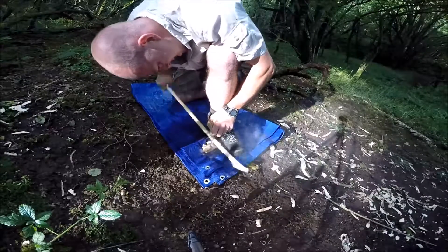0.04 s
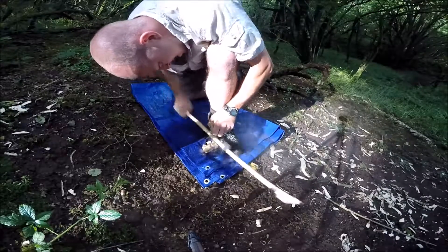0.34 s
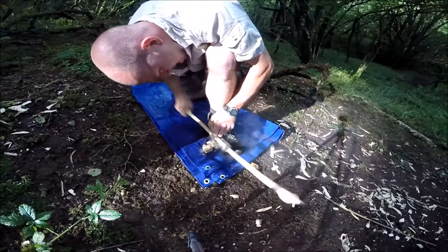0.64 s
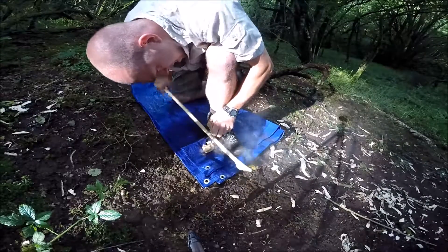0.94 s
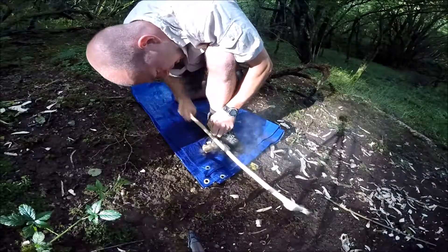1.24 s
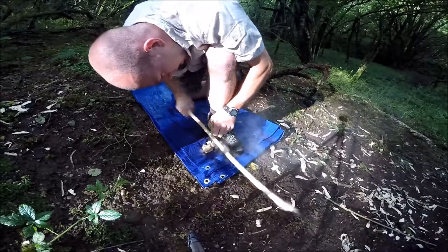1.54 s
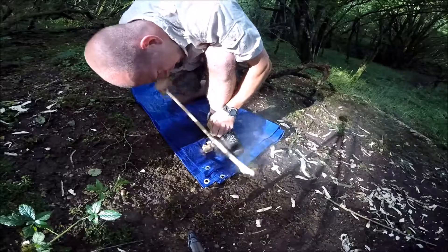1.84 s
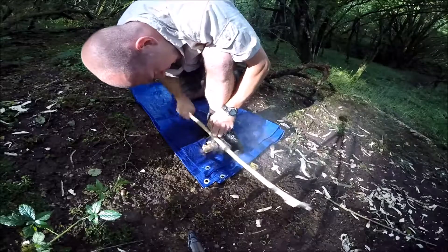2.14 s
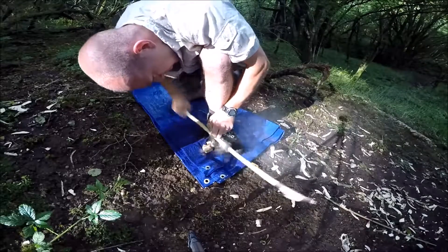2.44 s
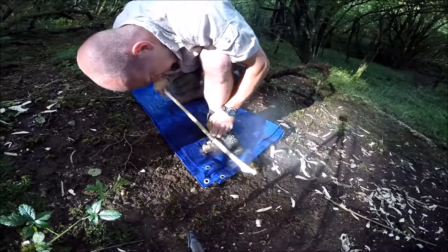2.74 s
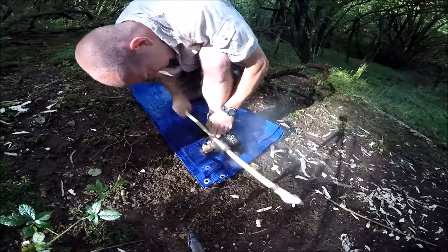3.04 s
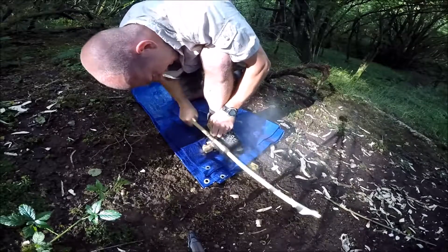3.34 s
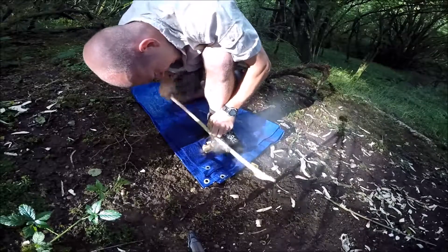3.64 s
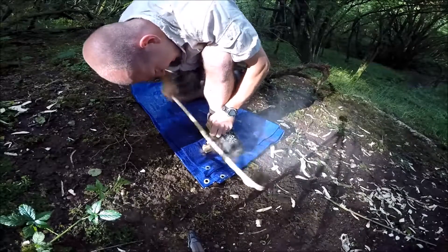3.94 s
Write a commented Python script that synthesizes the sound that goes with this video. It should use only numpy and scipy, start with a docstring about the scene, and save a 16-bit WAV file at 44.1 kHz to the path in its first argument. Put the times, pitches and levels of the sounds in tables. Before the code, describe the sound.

A bow drill's wooden spindle grinds against a board in quick, even back-and-forth strokes, each swelling and fading. The board judders on the ground with soft thumps and occasional ticks, close by, over a low outdoor rumble.

```python
"""Outdoors, on a wooden board lying on a tarp, a bow drill runs at about two strokes each way a second.
The spindle grinds in its socket as charred fibres slip and snap, speeding up and stopping with every
stroke, and knocks now and then. The board judders against the ground and body weight thuds into the soil.
Under it lie a low rumble, soft air and a faint pulsing electrical whine."""
import sys
import numpy as np
from scipy import signal
from scipy.fft import rfft, irfft
from scipy.io import wavfile
from scipy.ndimage import uniform_filter1d

SR = 44100
rng = np.random.default_rng(int(sys.argv[2]) if len(sys.argv) > 2 else 0)


def inscribe(sig):
    """Save sig as 16-bit PCM at rate SR to the path in sys.argv[1].

    A 1-D sig is mono; a 2-D sig holds one channel per row.
    Samples are clipped to [-1, 1] before scaling.
    """
    pcm = np.round(np.clip(np.atleast_2d(sig).T, -1, 1) * 32767)
    wavfile.write(sys.argv[1], SR, pcm.astype(np.int16))


N = 176400
T = np.arange(N) / SR
HZ = np.fft.rfftfreq(N, 1 / SR)

# Strokes of the bow. Each row: moment of full speed in seconds, run-up in seconds, level in dB,
# the socket's rasp in dB against the stroke.
PUSHES = [(0.217, 0.079, -47, -7), (0.695, 0.0766, -46.5, -18), (1.152, 0.0785, -46, -7),
          (1.587, 0.066, -46, -5), (2.039, 0.069, -46, -10), (2.482, 0.053, -44, -4.5),
          (2.915, 0.0597, -43, -4), (3.34, 0.0637, -46, -5), (3.752, 0.061, -46, -3.5)]
PULLS = [(-0.005, 0.065, -48, -13.5), (0.465, 0.0871, -47, -6), (0.921, 0.0878, -45.5, -10),
         (1.364, 0.0778, -47, -8), (1.836, 0.0879, -45.5, -4.5), (2.275, 0.0996, -48.5, -5),
         (2.717, 0.0838, -45, -4.5), (3.139, 0.0795, -44.5, -4.5), (3.555, 0.075, -46.5, -3.5),
         (3.966, 0.063, -44, -3)]
# Resonances of spindle and board. Each row: pitch in Hz, width in Hz, relative dB on a push and on a pull.
WOOD = [(786, 540, -20, -16.5), (1016, 35, -11.5, -16.5), (1498, 200, -5, -3), (1694, 165, -1, 1.5),
        (1870, 124, -1, -4.5), (2603, 110, -5, -2), (2840, 223, -13.5, 1.5), (3392, 654, -2.5, -4),
        (4464, 170, -7, -3.5), (4848, 263, -6.5, -1.5), (5290, 450, -11.5, -8), (5850, 330, -16, -13),
        (6430, 240, -16, -19.5), (7770, 1200, -26, -26.5), (9860, 1160, -30, -27.5)]


def spindle():
    """Pushes are shorter, grittier and airier than pulls; both set a few narrow resonances singing."""
    # Singing resonances. Each row: pitch in Hz, width in Hz, level in dB against the stroke.
    modes = [(759, 36.1, -26), (1842, 54.7, -13.5), (2870, 44, -21.5)]
    # Fine wood dust hissing on the pushes. Each row: frequency in Hz, relative level in dB.
    dust_spectrum = [(3000, -37), (9000, -9), (12000, -3), (15000, 3)]
    _, _, push_db, pull_db = np.transpose(WOOD)
    push = grind(PUSHES, push_db, level_db=-2.0, turns_per_s=29, wobble_db=2.0, flutter_db=0.8,
                 grains_per_s=1100, grain_spread_db=3.5, grit=0.51)
    pull = grind(PULLS, pull_db, level_db=-1.4, turns_per_s=61, wobble_db=1.5, flutter_db=1.85,
                 grains_per_s=1500, grain_spread_db=5.5, grit=0.31)
    singing = sum(amp(db) * unit(drift(width) * tone(hz + width / 2 * drift(38.2)))
                  for hz, width, db in modes)
    dust = amp(-29) * effort(PUSHES) * noise(dust_spectrum)
    return shifting_contact(push + pull + dust + effort(PUSHES + PULLS) * singing)


def grind(strokes, wood_db, level_db, turns_per_s, wobble_db, flutter_db,
          grains_per_s, grain_spread_db, grit):
    """Charred fibres slip and snap under the spindle, which bites harder once in every turn."""
    force = effort(strokes)
    speed = np.sqrt(force / force.max())
    turns = np.cumsum(turns_per_s * speed * (1 + 0.15 * drift(22))) / SR + rng.random()
    bite = amp(wobble_db * np.cos(2 * np.pi * turns) + flutter_db * drift(140))
    snaps = (rng.random(N) < grains_per_s * speed / SR) * rng.choice([-1, 1], N)
    sizes = amp(grain_spread_db * np.minimum(rng.exponential(1, N), 3.5))
    friction = unit(bite * (rng.standard_normal(N) + grit * unit(snaps * sizes)))
    rasp_hz = 3255 * (1 + .03 * (speed - 1))  # the socket's rasp sinks as the spindle slows
    rasp = resonate(bite * rng.standard_normal(N), rasp_hz, width_hz=230)
    return amp(level_db) * (wood(force * friction, wood_db) + effort(strokes, rasp=True) * rasp)


def effort(strokes, rasp=False):
    """Strength of the rubbing, or of the rasp: it swells to full speed and dies as the bow turns."""
    slowing_s, fall_db, flatness = .057, 10, 2.653
    strength = np.zeros(N)
    for peak_s, run_up_s, db, rasp_db in strokes:
        from_peak = abs(T - peak_s) / np.where(T < peak_s, run_up_s, slowing_s)
        strength += amp(db + rasp * rasp_db - fall_db * from_peak ** flatness)
    return strength


def wood(x, levels_db):
    """Rings the resonances of spindle and board in the given balance."""
    power = sum(amp(db) ** 2 / (1 + ((HZ - hz) / width) ** 2) ** 3
                for (hz, width, _, _), db in zip(WOOD, levels_db))
    log_gain = np.log(power + 1e-9) / 2
    mirrored = np.r_[log_gain, log_gain[-2:0:-1]]
    response = np.exp(np.conj(signal.hilbert(mirrored)))  # minimum phase: the ring follows the hit
    ring = np.fft.ifft(response).real[:2048]
    return signal.oaconvolve(x, ring / np.linalg.norm(ring))[:N]


def shifting_contact(x, patch_db=1.9, dulling_db_per_s=1, treble_hz=3750):
    """Resonances come and go as the spindle leans; the treble dulls as the socket chars."""
    hz, t, spectrum = signal.stft(x, SR, nperseg=512, noverlap=384)
    swells = uniform_filter1d(rng.standard_normal((len(t), len(hz))), size=7, axis=0)
    patches = unit(uniform_filter1d(swells, size=3, axis=1))
    treble = hz ** 8 / (hz ** 8 + treble_hz ** 8)
    wear_db = (t - t.mean())[:, None] * -dulling_db_per_s * treble
    gain = amp(patch_db * patches + wear_db).T
    return signal.istft(spectrum * gain, SR, nperseg=512, noverlap=384)[1][:N]


def knocks():
    """The spindle ticks in its socket; the board rocks with a hollow clunk."""
    # Ticks and clunks. Each row: start in seconds, level in dB.
    tick_hits = [(0.566, -49), (1.014, -56), (1.080, -43), (2.815, -51), (2.891, -37.5)]
    clunk_hits = [(0.566, -53), (1.171, -55.5), (2.07, -57), (2.946, -51.5)]
    # The clunk's hollow colour. Each row: frequency in Hz, relative level in dB.
    hollow = [(330, -18), (530, 0), (850, -4), (2500, -31)]
    dull_db = [push_db - .0015 * hz for hz, _, push_db, _ in WOOD]
    ticks = wood(decays(tick_hits, fade_s=0.0039) * rng.standard_normal(N), dull_db)
    return ticks + decays(clunk_hits, fade_s=0.0063) * noise(hollow)


def board():
    """The board judders on the ground with a higher ring, and murmurs just behind each stroke."""
    # Judders. Each row: centre in seconds, half length in seconds, pitch in Hz, level in dB, ring in dB.
    judders = [(0.026, 0.011, 104, -25, -35.5), (0.075, 0.02, 106.7, -33.5, -59),
               (0.242, 0.035, 96.3, -34, -46), (0.309, 0.017, 124.6, -36, -63),
               (0.557, 0.015, 102, -32, -53), (0.735, 0.031, 95, -29.5, -51),
               (0.977, 0.0089, 97.95, -31, -42.5), (1.01, 0.014, 109.3, -34.5, -55),
               (1.173, 0.04, 94, -33, -51.5), (1.47, 0.04, 105.7, -42.5, -73),
               (1.628, 0.036, 92.8, -32, -52.5), (1.688, 0.026, 118.5, -34.5, -62),
               (1.895, 0.018, 99, -32, -51.5), (2.093, 0.016, 96, -29.5, -52),
               (2.296, 0.015, 119.2, -35.5, -57), (2.526, 0.037, 89.9, -34.5, -57.5),
               (2.592, 0.017, 117, -30.5, -64), (2.737, 0.0083, 106.5, -31, -50),
               (2.795, 0.03, 125.1, -35, -56.5), (2.967, 0.028, 101, -32.5, -58),
               (3.118, 0.013, 110.7, -40.5, -51), (3.368, 0.037, 97, -33, -54),
               (3.44, 0.013, 128, -33.5, -81), (3.597, 0.015, 112.8, -38, -61),
               (3.782, 0.039, 96.6, -35.5, -54.5), (3.847, 0.013, 111, -31.5, -71)]
    # The wood's low murmur. Each row: frequency in Hz, relative level in dB.
    murmur = [(60, -9), (135, 7.5), (160, 6.5), (178, -8), (210, 3), (240, -10.5), (285, 3), (335, -13.5),
              (375, -17), (430, -21.5), (800, -46.5)]
    out, wander, rough = np.zeros(N), drift(40.2), drift(75)
    ring = tone(275 + 20 * drift(52.24)) * unit(1 + 0.44 * drift(30))
    for centre_s, half_s, hz, db, ring_db in judders:
        swell = np.exp(-((T - centre_s) / half_s) ** 2 / 2)
        shudder = amp(db) * tone(hz * (1 + .075 * wander)) * (1 + .27 * rough)
        out += swell * (shudder + amp(ring_db) * ring)
    lag_s, pull_db = 0.037, -2.5
    load = np.interp(T - lag_s, T, effort(PUSHES) + amp(pull_db) * effort(PULLS))
    return out + amp(-3) * load * noise(murmur)


def thuds(hz=35.07, rise_s=0.05, fade_s=0.095):
    """Body weight thuds into the soil, mostly at the end of a push."""
    # Each row: peak in seconds, level in dB.
    peaks = [(.31, -36.5), (.765, -32), (1.22, -37.5), (1.66, -39.5), (2.12, -36), (2.554, -32),
             (3.01, -36.5), (3.43, -40), (3.62, -42.5)]
    weight = sum(amp(db) * np.exp(-abs(T - s) / np.where(T < s, rise_s, fade_s)) for s, db in peaks)
    return weight * tone(hz + 2 * drift(15.2))


def outdoors():
    """A steady bed of ground rumble and soft air."""
    # Their colours. Each row: frequency in Hz, relative level in dB.
    rumble = [(15, -24), (35, -1), (55, -4), (95, -1), (135, -4.5), (160, -12), (180, -28.5), (230, -34.5),
              (280, -17.5), (335, -42.5), (375, -29), (450, -67), (900, -72)]
    air = [(100, -22), (400, 3), (800, 1.5), (1500, -5), (3200, -0.5), (6000, -7), (10000, -12),
           (15000, -15.5)]
    return amp(-41) * noise(rumble) + amp(-65) * noise(air)


def whine(pips_per_s=40, buzz_db=-73.5):
    """A faint electrical whine in quick pips, with a thinner whistle above and an occasional buzz."""
    # Short thin buzzes. Each row: start in seconds, end in seconds.
    buzzes = [(1.915, 2.0), (3.82, 3.9)]
    pulse = (1 + np.cos(2 * np.pi * pips_per_s * (T - .002))) / 2
    pips = amp(-72) * pulse ** 3.6 * tone(8450 + 45 * drift(166))
    whistle = amp(-83) * pulse * tone(13480 + 20 * drift(200))
    gate = uniform_filter1d(sum(1. * (T > start) * (T < end) for start, end in buzzes), size=300)
    root_hz = 3240 + 22 * drift(320)
    buzz = amp(buzz_db) * tone(2 * root_hz) + amp(buzz_db - 7) * tone(3 * root_hz)
    return pips + whistle + gate * buzz


def amp(db):
    """Decibels to gain."""
    return 10 ** (np.asarray(db) / 20)


def unit(x):
    """Scales to rms 1."""
    return x / np.sqrt(np.mean(x ** 2) + 1e-20)


def noise(points):
    """Noise of rms 1, coloured by (Hz, dB) points."""
    hz, db = np.transpose(points)
    colour = amp(np.interp(np.log(HZ + 1), np.log(hz), db))
    return unit(irfft(rfft(rng.standard_normal(N)) * colour, N))


def drift(rate_hz):
    """A smooth random wander of rms 1, up to about the given rate."""
    return unit(irfft(rfft(rng.standard_normal(N)) * np.exp(-(HZ / rate_hz) ** 2), N))


def tone(hz):
    """A sine of rms 1 that follows a pitch curve."""
    return np.sqrt(2) * np.sin(2 * np.pi * (np.cumsum(hz) / SR + rng.random()))


def decays(hits, fade_s):
    """An envelope that jumps at each hit and dies away."""
    return sum(amp(db) * (T >= s) * np.exp(-abs(T - s) / fade_s) for s, db in hits)


def resonate(x, hz, width_hz):
    """A steep resonance that follows a pitch curve."""
    carrier = np.exp(2j * np.pi * np.cumsum(hz) / SR)
    pole = np.exp(-np.pi * width_hz / SR)
    return unit((carrier * signal.lfilter([1], [1, -2 * pole, pole * pole], x / carrier)).real)


def scene():
    """Everything at one nearby microphone."""
    return (spindle() + knocks() + board() + thuds() + outdoors() + whine())[None]


def record(dry, low_cut_hz=21.3, high_cut_hz=15350):
    """A low cut and a steep high cut trim the extremes."""
    low_cut = signal.butter(3, low_cut_hz, "highpass", fs=SR, output="sos")
    high_cut = signal.firwin(511, high_cut_hz, window=("kaiser", 9), fs=SR)
    return signal.oaconvolve(signal.sosfilt(low_cut, dry), high_cut[None], "same")


dry = scene()
out = record(dry)
inscribe(out)
```